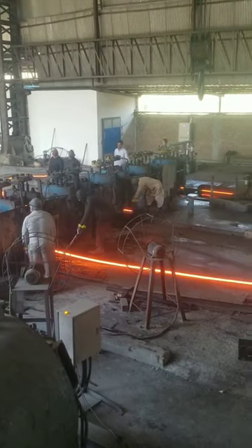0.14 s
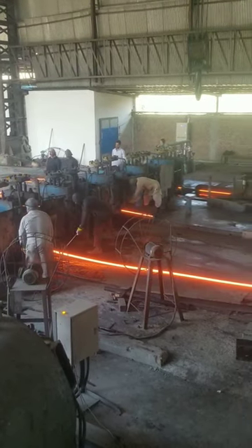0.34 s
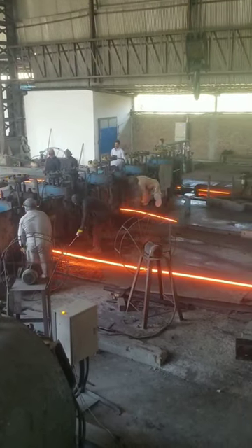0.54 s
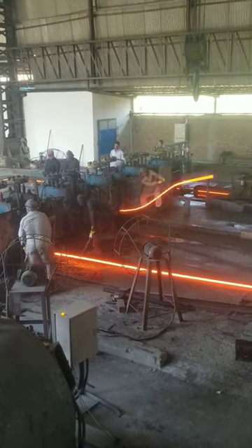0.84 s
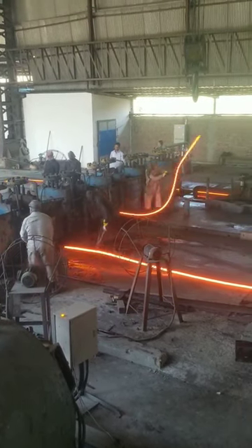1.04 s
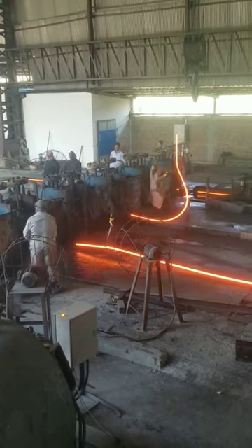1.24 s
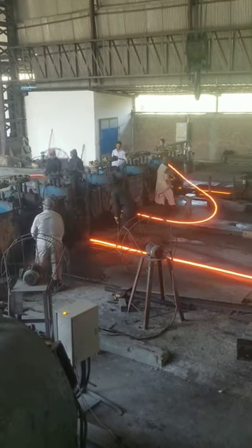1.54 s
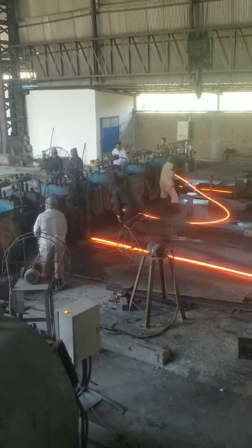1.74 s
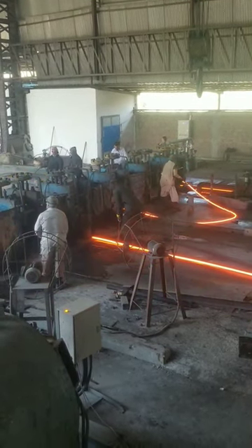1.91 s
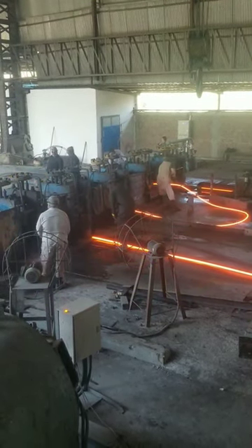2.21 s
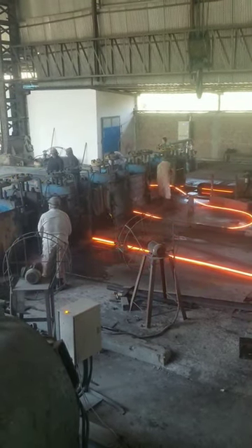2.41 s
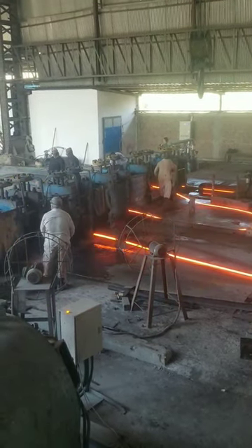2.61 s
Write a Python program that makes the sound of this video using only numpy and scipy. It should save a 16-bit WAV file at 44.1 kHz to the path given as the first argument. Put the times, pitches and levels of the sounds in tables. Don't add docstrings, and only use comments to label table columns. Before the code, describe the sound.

A steel rolling mill roars low and steady in a large echoing shed, gears humming unevenly, rollers rattling, water hissing faintly; blurred distant bar clanks come and go, picked up by a phone at some distance.

```python
import sys
import numpy as np
from scipy import signal
from scipy.fft import rfft, irfft, next_fast_len
from scipy.io import wavfile
from scipy.ndimage import uniform_filter1d, map_coordinates

SR = 44100
rng = np.random.default_rng(int(sys.argv[2]) if len(sys.argv) > 2 else 0)


def to_linear_factor(level_db):
    exponent = np.asarray(level_db, float) / 20
    return 10 ** exponent


def master(y):
    cut = np.clip(np.atleast_2d(y).T, -1, 1)
    pcm = np.round(cut * 32767)
    wavfile.write(sys.argv[1], SR, pcm.astype(np.int16))


N = 121716


def unit(x):
    return x / np.sqrt(np.mean(x ** 2) + 1e-20)


def along(points, hz):
    f, v = np.transpose(points)
    return np.interp(np.log(hz + 1), np.log(f + 1), v)


def curves(rows):
    s, *cols = np.transpose(rows)
    return [np.interp(np.arange(N) / SR, s, c) for c in cols]


def wobble(rate):
    return map_coordinates(rng.standard_normal(400), [np.arange(N) * min(rate, 120) / SR])


def filtered(x, response):
    m = next_fast_len(N + SR // 2)
    return irfft(rfft(x, m) * response(np.fft.rfftfreq(m, 1 / SR)), m)[..., :N]


# f/Hz, likeness/1
LIKENESS = [(30, 0.98), (130, 0.93), (290, 0.94), (630, 0.19), (950, 0.24), (1300, -0.4), (2200, 0.24),
            (6000, -0.00011)]


def spread(pair, gain):
    def turn(hz):
        return np.arccos(np.clip(along(LIKENESS, hz), -1, 1)) / 2

    mid, side = filtered(pair, lambda hz: gain(hz) * [np.cos(turn(hz)), np.sin(turn(hz))])
    return unit(np.array([mid + side, mid - side]))


def rush(spectrum, patchy_db, knocks, specks_db):
    struck = rng.random((2, N)) < 300 / SR
    blows = rng.exponential(1, (2, N)) * struck * rng.choice([-1, 1], (2, N))
    z = signal.stft(rng.standard_normal((2, N)) + knocks * unit(blows), nperseg=1024)[2]
    patches = uniform_filter1d(rng.standard_normal(z.shape[1:]), size=9, axis=0)
    patches = uniform_filter1d(patches, size=4, axis=1)
    specks = uniform_filter1d(rng.standard_normal(z.shape), size=2, axis=2)
    z = z * to_linear_factor(patchy_db * unit(patches) + specks_db * unit(specks))
    pair = signal.istft(z, nperseg=1024)[1][:, :N]
    return spread(pair, lambda hz: to_linear_factor(along(spectrum, hz)))


def surges(events, lift_db):
    rise_s = 0.0064
    s, db, fade_s = np.transpose(events)[:, :, None]
    age = np.clip(np.arange(N) / SR - s + rise_s, 0, None)
    height_db = np.clip(lift_db + db - db.mean(), 0, None)
    swell = (height_db * np.exp(-age / fade_s) * (1 - np.exp(-age / rise_s))).sum(axis=0)
    return swell - swell.mean()


def gear(track, teeth, waver_db, slip):
    hz, level_db = curves(track)
    turn = 2 * np.pi * np.cumsum(hz) / SR
    right_drift = np.array([[0], [.3]])
    hum = 0
    for k, db in teeth:
        waver = waver_db * (wobble(14) + 0.57 * wobble(33.05))
        phase = k * turn + slip * wobble(16) + right_drift * wobble(3.61)
        hum = hum + to_linear_factor(db + waver) * np.sin(phase)
    return to_linear_factor(level_db - 1) * hum


# t/s, level/dB
MILL_LOAD = [(0, -12), (.16, -16), (.32, -14), (.36, -23.5), (.39, -14), (.65, -17), (.72, -15), (.92, -14),
             (1.2, -13), (1.34, -11.5), (1.435, -12.5), (1.47, -14), (1.6, -15), (1.8, -15), (1.98, -14),
             (2.4, -14.5), (2.57, -16.5), (2.76, -11.5)]


def load_swing():
    load_db, = curves(MILL_LOAD)
    return load_db - load_db.mean()


# t/s, level/dB, fade/s
ROLL_JOLTS = [(0.033, -3.5, 0.12), (0.216, -3, 0.054), (0.314, -1.5, 0.055), (0.385, -3.5, 0.044),
              (0.445, -9.5, 0.041), (0.477, 2, 0.043), (0.599, 0.5, 0.043), (0.698, -2, 0.069),
              (0.872, -5.5, 0.05), (0.978, -9, 0.038), (1.047, -7, 0.068), (1.176, -7, 0.023),
              (1.253, -11, 0.062), (1.407, -7, 0.017), (1.459, -1, 0.061), (1.603, -6, 0.05),
              (1.632, -6, 0.073), (1.753, -7.5, 0.048), (1.841, -6.5, 0.089), (2.06, -2, 0.047),
              (2.126, -7.5, 0.045), (2.154, -5.5, 0.041), (2.259, -4, 0.038), (2.326, -2, 0.053),
              (2.392, -2.5, 0.046), (2.47, 0, 0.035), (2.563, -8.5, 0.036), (2.61, -0.5, 0.017),
              (2.676, -14.5, 0.041)]


def jolts():
    return surges(ROLL_JOLTS, 6.5)


# f/Hz, level/dB per Hz
WATER_SPECTRUM = [(2240, -37), (3800, -6), (4050, 0), (4540, -0.5), (5710, -5.5), (8000, -23), (10000, -16),
                  (11400, -16.5), (14900, -24.5)]


def water(swing_db, shared_db):
    level_db = -39 + 0.18 * swing_db + shared_db + 0.38 * wobble(5.3)
    return to_linear_factor(level_db) * rush(WATER_SPECTRUM, patchy_db=0.1, knocks=0.079, specks_db=3.5)


# f/Hz, t60/s
HALL_DECAY = [
    (200, 0.96),
    (2000, 2.6),
    (10000, 0.68),
]


def hall(x):
    hz, t, z = signal.stft(rng.standard_normal((2, SR // 2)), SR, nperseg=256)
    tail = signal.istft(z * to_linear_factor(-60 * t / along(HALL_DECAY, hz)[:, None]), SR, nperseg=256)[1]
    return signal.fftconvolve(x[None], tail / np.linalg.norm(tail[0]), axes=1)


# pitch ratio/1, level/dB
BAR_MODES = [(.62, -2.5), (1.012, 0.5), (1.47, -7.5), (2.1, -10.5)]
# t/s, level/dB, f/Hz
BAR_BLOWS = [(.314, -19.5, 484), (0.594, -27, 340), (.69, -16.5, 443), (.715, -29, 1780),
             (.78, -27.5, 1170), (.96, -36, 1410), (1.2, -24.5, 840), (1.33, -26, 404), (1.46, -22, 422),
             (1.545, -19, 539.4), (1.594, -32, 2800), (1.69, -27, 820), (.545, -26.5, 875),
             (.93, -31, 1400), (1.06, -32.5, 2460), (0.734, -31, 2305), (.95, -29.5, 2000),
             (2.49, -26, 370), (1.966, -19.5, 460), (2.05, -42, 1520), (2.209, -28, 702), (2.33, -49, 890),
             (2.6, -29, 1630)]


def clanks():
    rise_s, fade_s = 0.007, 0.021
    sharpness = 5.7
    out, t = np.zeros((2, 2 * N + SR)), np.arange(N) / SR
    shape = np.exp(-t / fade_s) * (1 - np.exp(-t / rise_s))
    for s, db, hz in BAR_BLOWS:
        def bar(f):
            total = 0
            for k, (ratio, level) in enumerate(BAR_MODES):
                pitch = hz * ratio
                mode = 1j * f / ((pitch ** 2 - f * f) * sharpness / pitch + 1j * f)
                total = total + (-1) ** k * to_linear_factor(level) * mode
            return total

        burst = unit(filtered(filtered(rng.standard_normal(N), bar), bar))
        ring = to_linear_factor(db + 7) * (shape * burst)[:SR // 4]
        echo = to_linear_factor(-9) * hall(np.pad(ring, (500, 0)))
        start = round(s * SR)
        out[:, start:start + len(ring)] += ring
        out[:, start:start + echo.shape[1]] += echo
    return out[:, :N]


MOTOR_PITCHES = [33, 121, 297, 387, 655, 872, 1216, 1398, 1870, 2792, 3085, 3612, 4556]
# width/Hz, level/dB
MOTOR_TONES = [(5.03, -48), (7.1, -39), (13.8, -31.5), (15.9, -34), (5.5556, -60), (39.6, -37.5),
               (10.9, -39.5), (10, -42), (18, -47), (15.1, -44.5), (63.3, -41), (12.6, -51), (20, -53)]


def motors():
    out = 0
    for hz, (width, db) in zip(MOTOR_PITCHES, MOTOR_TONES):
        noise = rng.standard_normal((2, N))
        out = out + to_linear_factor(db) * spread(noise, lambda f: 1 / (1 + (2 * (f - hz) / width) ** 4))
    return out


# t/s, f/Hz (tooth rate), level/dB
IDLER_TRACK = [(0.0, 384.2, -21), (0.12, 380.7, -32), (0.25, 397.4, -26), (0.58, 379.5, -26.5),
               (0.71, 397.9, -30), (0.92, 375.7, -25), (0.95, 384.3, -20), (1.16, 389.0, -27),
               (1.32, 373.0, -25), (1.42, 386.0, -27), (1.74, 388.9, -23), (1.78, 397.5, -37),
               (1.9, 376.9, -23.5), (2.43, 396.2, -22.5), (2.64, 370.5, -31), (2.76, 374.9, -28)]


def idler():
    return gear(IDLER_TRACK, [(1, -1.3)], waver_db=0.7, slip=0.62)


# t/s, level/dB, fade/s
SCALE_RATTLES = [(0.0902, -15, 0.03), (0.1511, -21, 0.03), (0.3122, -24, 0.03), (0.5257, -17.5, 0.017),
                 (0.5656, -16.5, 0.03), (0.6185, -10.5, 0.021), (0.7113, -15, 0.022),
                 (0.7836, -22.5, 0.023), (0.829, -14.5, 0.027), (0.9762, -14, 0.033), (1.2955, -20, 0.02),
                 (1.3758, -16.5, 0.051), (1.506, -15, 0.024), (1.5998, -15, 0.044), (1.9081, -13.5, 0.03),
                 (2.3216, -18, 0.01), (2.4164, -18.5, 0.045), (2.611, -16, 0.016), (2.6549, -17.5, 0.04),
                 (2.6874, -20, 0.04)]
# f/Hz, level/dB per Hz
ROLLER_SPECTRUM = [(350, -57), (680, -3), (880, -0.5), (1030, -5.5), (1400, -4.5), (2000, -12),
                   (3300, -11.5), (3850, -21), (4600, -74), (9000, -120)]


def roller_tables(swing_db, shared_db):
    grit_db = surges(SCALE_RATTLES, 1)
    level_db = -22.5 + 0.38 * swing_db + grit_db + shared_db + 0.31 * wobble(16)
    return to_linear_factor(level_db) * rush(ROLLER_SPECTRUM, patchy_db=1.48, knocks=0.21, specks_db=3.0)


# f/Hz, level/dB per Hz
STAND_SPECTRUM = [(13, -59), (25, -31), (55, -28), (105, -13.5), (145, -14.5), (190, -6.5), (270, -3.5),
                  (480, -8.5), (620, -14.5), (850, -36.5), (1500, -120)]


def stands(swing_db, jolt_db):
    level_db = -18 + swing_db + 0.34 * jolt_db + 0.35 * wobble(6.43)
    return to_linear_factor(level_db) * rush(STAND_SPECTRUM, patchy_db=1.3, knocks=0.26, specks_db=1.47)


# t/s, gap/s
SLACK_MOMENTS = [(.03, 0.021), (.17, 0.027), (.5, 0.024), (.69, 0.033), (.77, 0.0092), (.84, 0.029),
                 (.96, 0.018), (1.03, 0.012), (1.08, 0.013), (1.17, 0.033), (1.27, 0.03), (1.44, 0.014),
                 (1.599, 0.028), (1.66, 0.012), (1.731, 0.023), (1.82, 0.02), (1.93, 0.011), (2.09, 0.026),
                 (2.168, .015), (2.24, 0.014), (2.311, 0.018), (2.38, 0.028), (2.44, .025), (2.56, 0.036),
                 (2.65, 0.018)]


def backlash():
    s, gap_s = np.transpose(SLACK_MOMENTS)[:, :, None]
    return np.tanh((np.arange(N) / SR - s) / gap_s).prod(axis=0)


# t/s, f/Hz (tooth rate), level/dB
MAIN_TRACK = [(0, 283.2, -21.5), (.3, 281, -29.5), (.65, 282, -28), (.75, 282.4, -20), (.95, 282, -18.5),
              (1.1, 282, -18), (1.35, 281, -19.5), (1.45, 280.5, -23), (1.55, 284, -17), (1.75, 282.8, -23),
              (1.9, 281.5, -16), (2.1, 280.3, -18.5), (2.35, 279.4, -19), (2.55, 280.3, -21),
              (2.76, 284.4, -17)]
PINION_TRACK = [(0, 189.7, -24), (.4, 189, -29.5), (.9, 190, -20), (1.2, 189, -22), (1.55, 190, -23.5),
                (1.76, 189.3, -14.5), (1.85, 191.3, -26.5), (1.99, 191.4, -7), (2.1, 189.4, -24),
                (2.3, 190.5, -25.5), (2.5, 188.7, -29.5), (2.76, 193.5, -36)]
STAND_TRACK = [(0, 220.1, -17), (.4, 223.1, -25.5), (.85, 220, -17), (1.0, 220.1, -22.5), (1.2, 220.6, -19),
               (1.35, 221.6, -15.5), (1.55, 219.6, -19), (2.0, 219.9, -24.5), (2.4, 221.7, -24),
               (2.76, 224, -37)]
# multiple/1, level/dB
MAIN_TEETH = [(1, 4.5), (2, -17)]


def gearbox():
    main = gear(MAIN_TRACK, MAIN_TEETH, waver_db=1.5, slip=0.8)
    pinion = gear(PINION_TRACK, [(1, -2.0)], waver_db=2.5, slip=0.75)
    stand = gear(STAND_TRACK, [(1, -1.6)], waver_db=4.0, slip=0.87)
    return to_linear_factor(1.5) * backlash() * main + pinion + stand


# f/Hz, left over right/dB
LEFT_LEAN = [(60, 0), (180, 3.5), (540, 2.0), (1610, 1), (4840, -2.5), (14500, -1.5)]


def scene():
    swing_db, jolt_db = load_swing(), jolts()
    shared_db = 0.5 * wobble(13) + 0.37 * wobble(20)
    mix = water(swing_db, shared_db) + clanks() + idler()
    mix = mix + roller_tables(swing_db, shared_db) + stands(swing_db, jolt_db)
    mix = mix + to_linear_factor(0.98 * swing_db) * (motors() + to_linear_factor(1.06 * jolt_db) * gearbox())
    return filtered(mix, lambda hz: to_linear_factor(along(LEFT_LEAN, hz) * np.array([[.5], [-.5]])))


def low_pass(x):
    return signal.sosfilt(signal.butter(12, 15140, fs=SR, output="sos"), x)


def record(dry):
    return low_pass(np.clip(dry, -.97, .97))


dry = scene()
out = record(dry)
master(out)
```